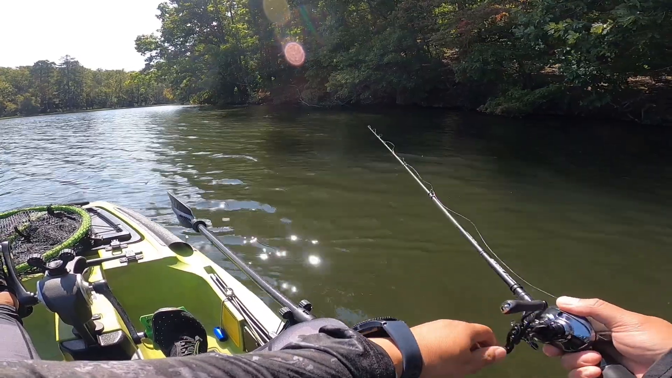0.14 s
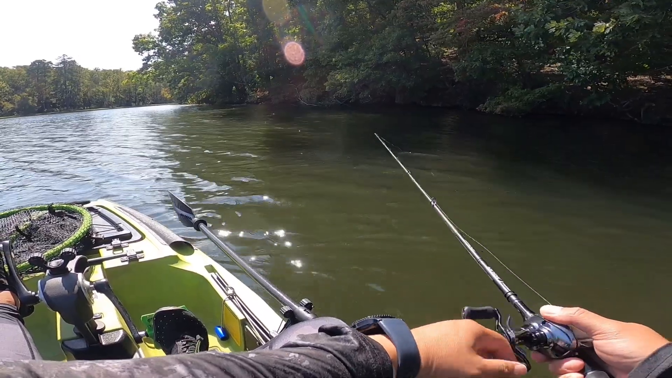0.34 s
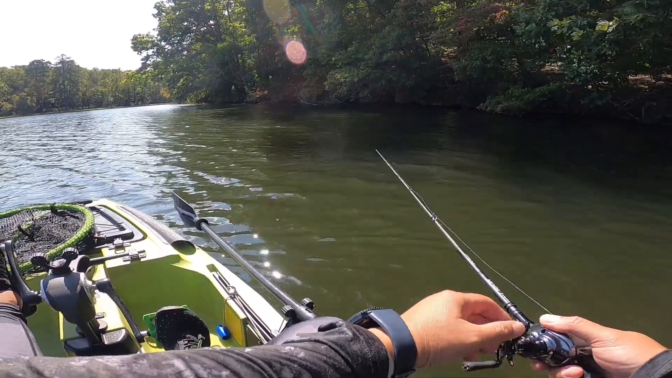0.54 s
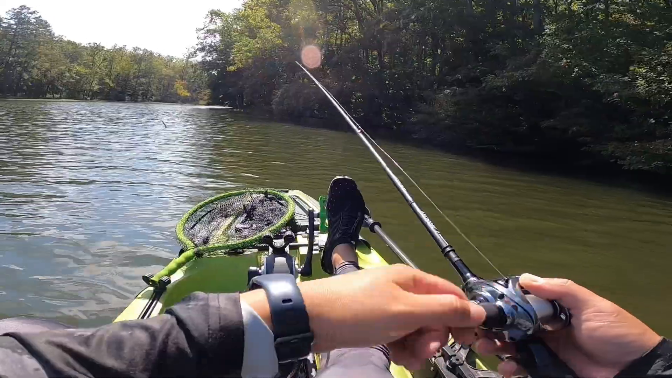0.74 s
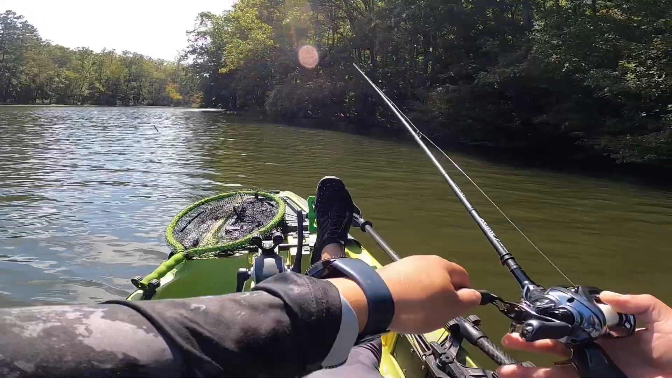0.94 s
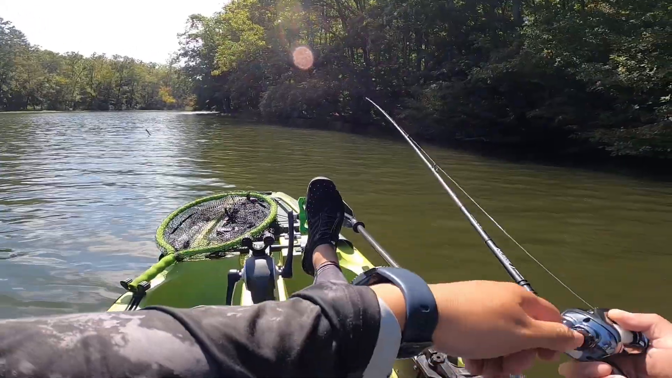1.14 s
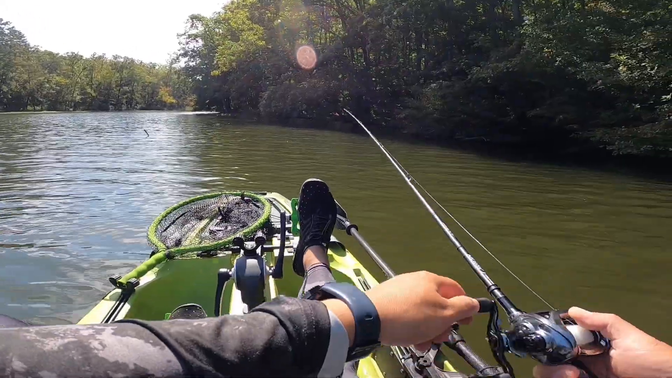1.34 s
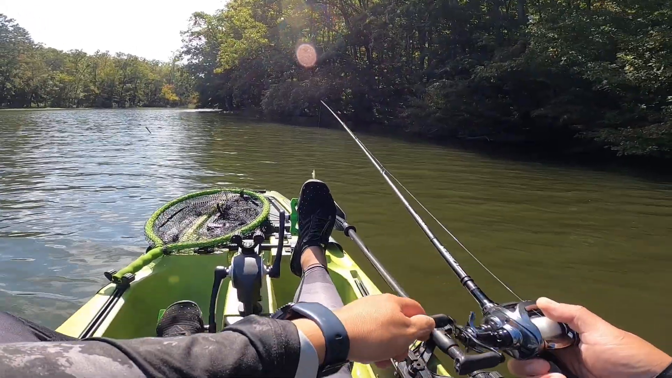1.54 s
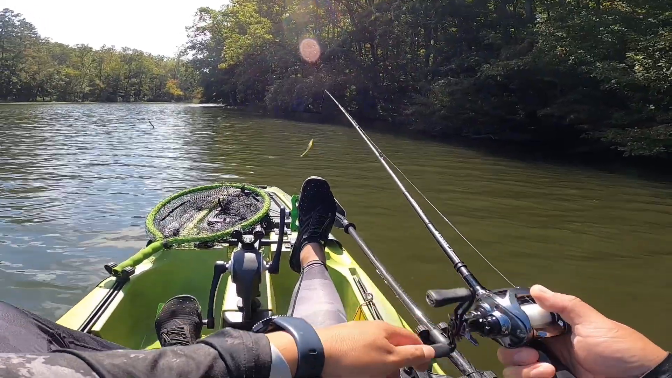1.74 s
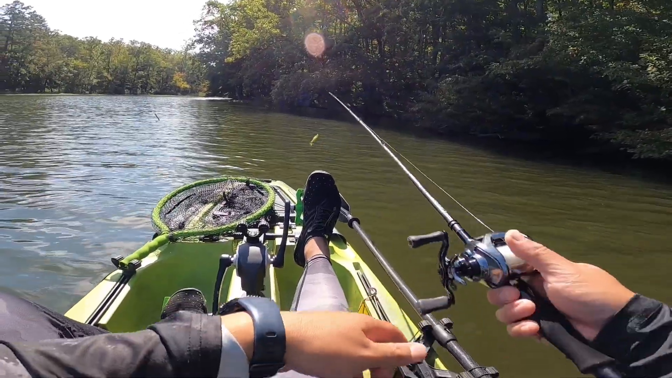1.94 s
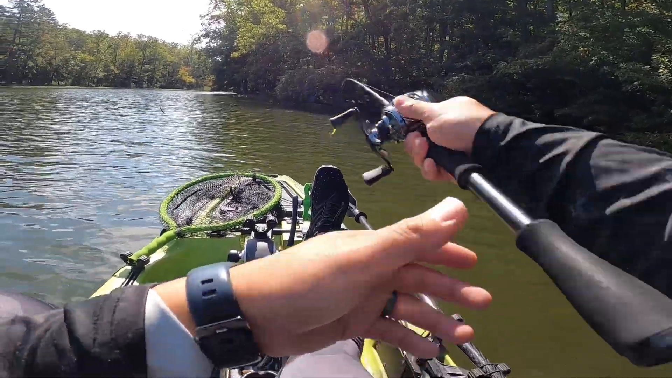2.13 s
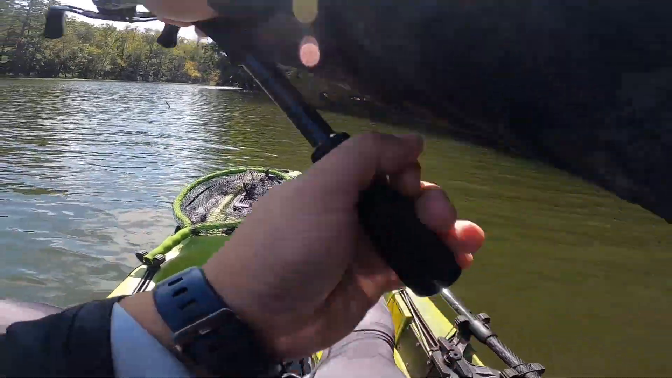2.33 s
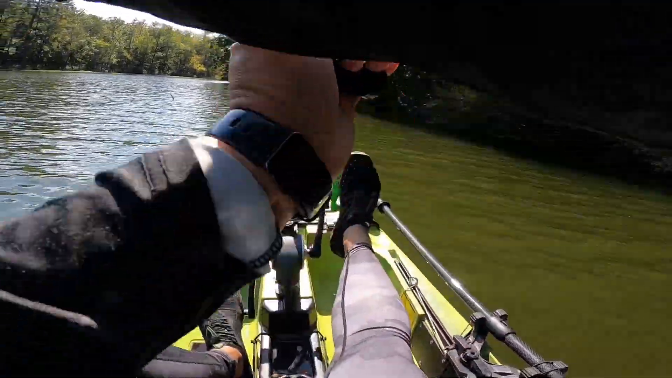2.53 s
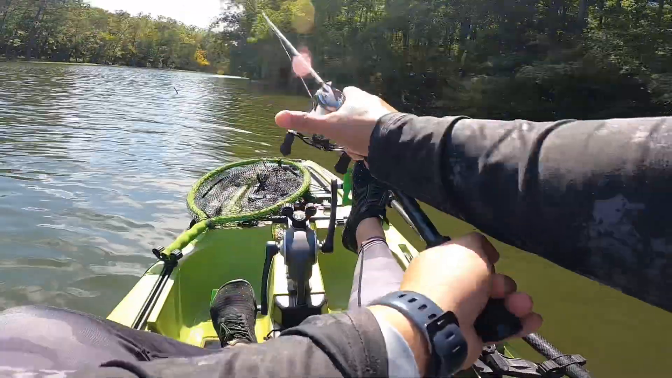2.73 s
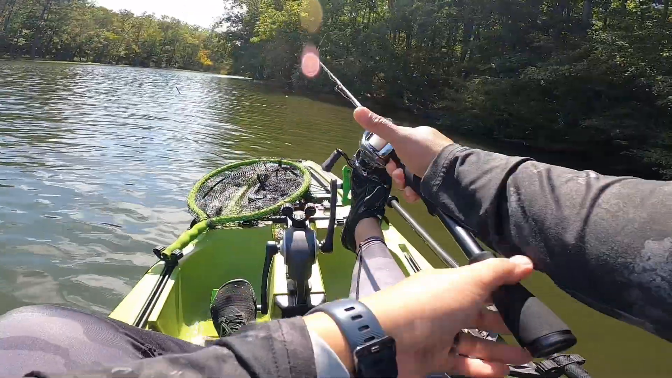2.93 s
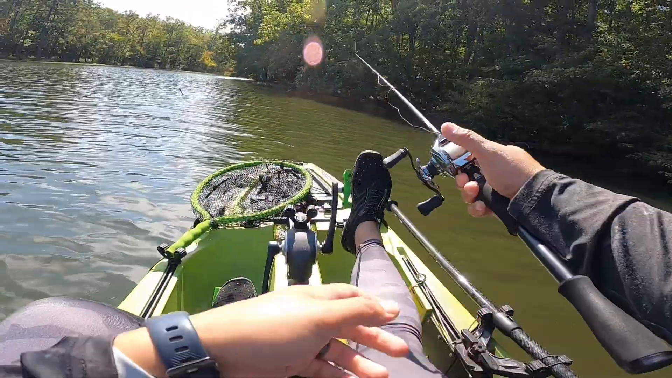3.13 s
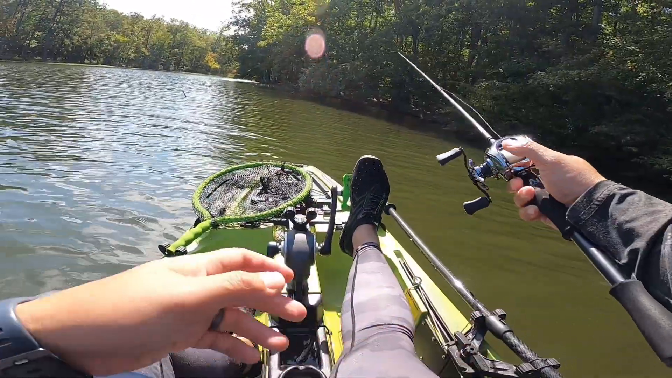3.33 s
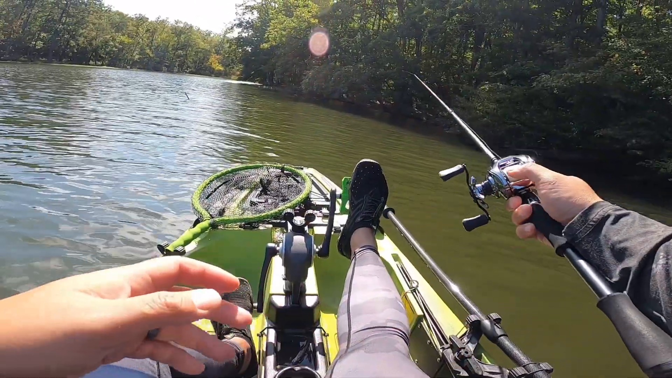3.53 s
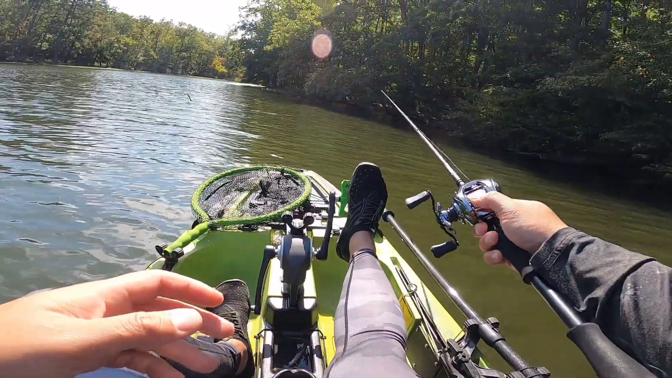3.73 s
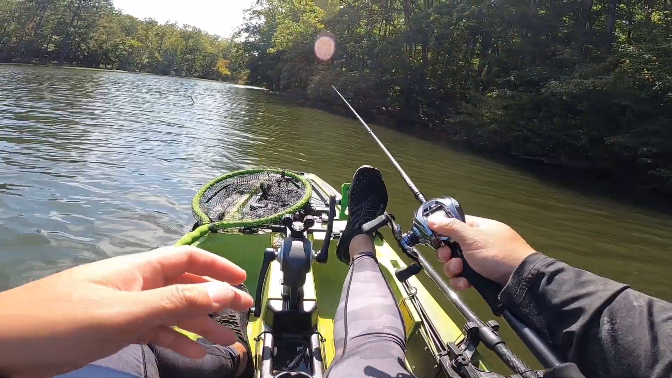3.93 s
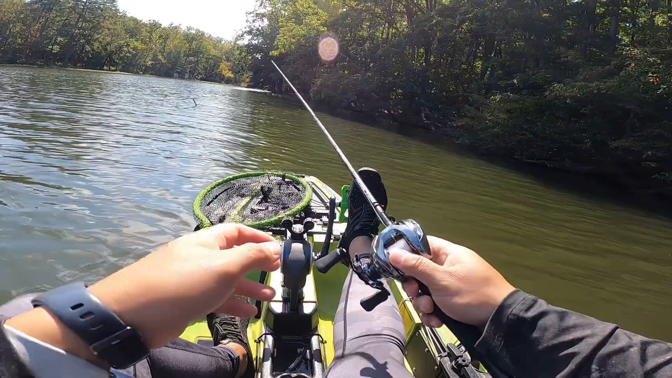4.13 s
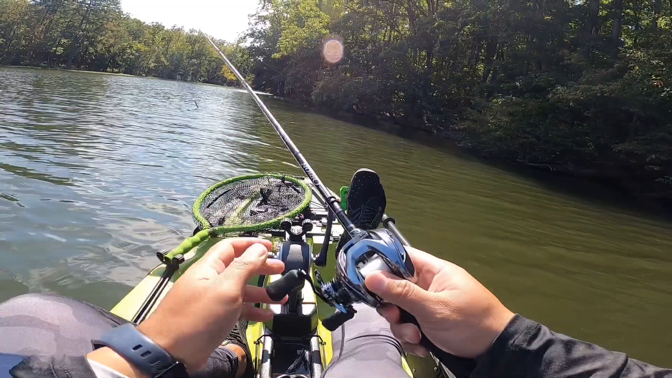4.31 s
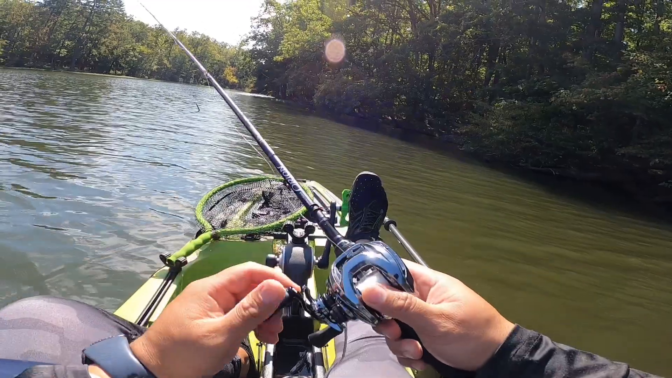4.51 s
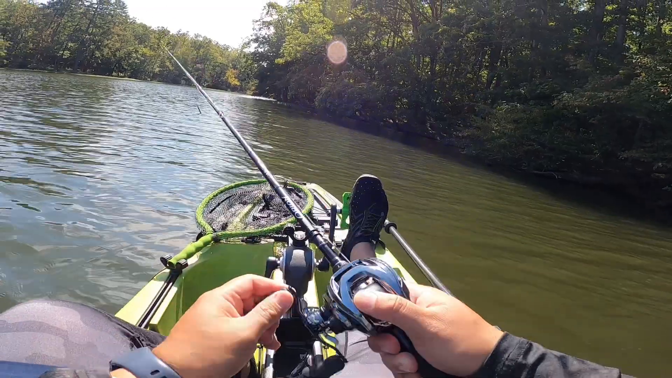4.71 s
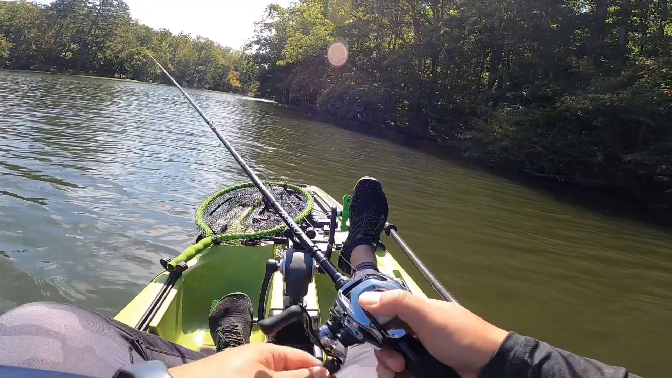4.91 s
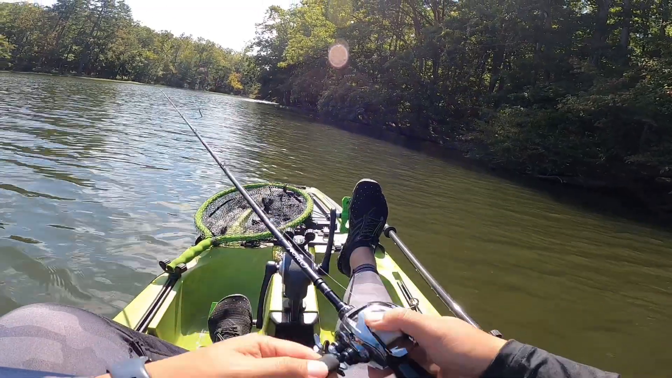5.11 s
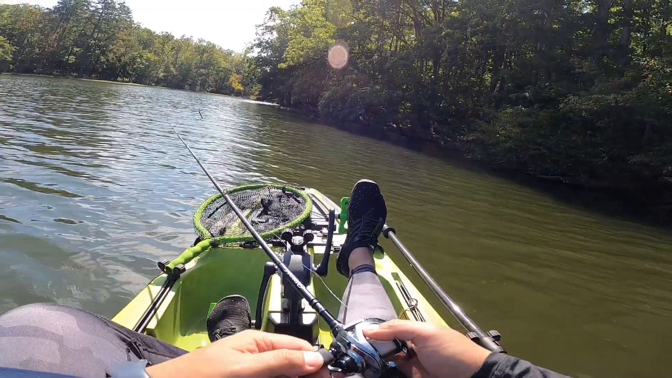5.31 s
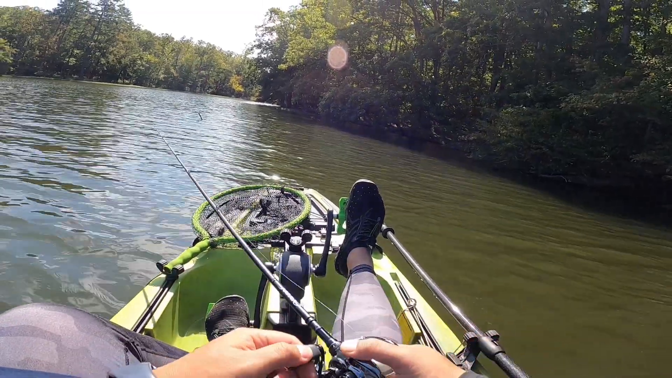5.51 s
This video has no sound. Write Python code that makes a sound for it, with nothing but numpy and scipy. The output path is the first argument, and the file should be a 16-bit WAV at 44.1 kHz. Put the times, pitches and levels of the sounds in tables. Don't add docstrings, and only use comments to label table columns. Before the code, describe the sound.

Low bumpy rumble and cloth rubbing on a chest camera as a fishing reel clicks, a cast thuds hard, then a sharp metallic reel snap.

```python
import sys
import numpy as np
from scipy import signal
from scipy.fft import rfft, irfft
from scipy.io import wavfile
from scipy.ndimage import uniform_filter1d

SR = 44100
rng = np.random.default_rng(int(sys.argv[2]) if len(sys.argv) > 2 else 0)


def wav_record(signal):
    frames = np.transpose(np.atleast_2d(signal))
    bounded = np.clip(frames, -1, 1)
    quanta = np.round(bounded * 32767).astype(np.int16)
    wavfile.write(sys.argv[1], SR, quanta)


def level_to_linear(level):
    exponent = np.asarray(level, float) / 20
    return 10 ** exponent


N = 245195
TIME = np.arange(N) / SR

# (frequency [Hz], density [dB/Hz])
SHAKE_COLOUR = [(12, -38), (20, -5), (91, -1), (125, 0.5), (172, 0), (305, -8.5), (381, -14.5),
                (419, -22.5), (595, -24), (831, -31), (900, -25), (1170, -31.5), (1980, -120)]
SHAKE_SIDE = [(12, -50), (20, -21.5), (97, 0), (135, -11), (215, -12), (532, -32.5), (900, -34),
              (1170, -59), (1980, -120)]
# (time [s], shake [dB], port difference [dB])
EFFORT = [(0, -53.5, -3), (.3, -52.5, -7), (.645, -50.5, -8), (.665, -36, -3), (.92, -30, -7),
          (1.05, -38, -4), (1.3, -33, -11), (1.75, -35, -12), (2.05, -39, -6.5), (2.45, -28, -2),
          (2.7, -33, -14), (3.06, -37, -3), (3.33, -38, 3), (3.42, -41, 0), (3.95, -43, 0),
          (4.05, -36.5, 4), (5.0, -37.5, -23), (5.4, -43, -14)]
JOLT_SHAKE_DB, JOLT_APART_DB = -4.5, -2
JOLT_RISE_S, JOLT_FALL_S, TWIST_FALL_S = 0.029, 0.046, 0.046

# (frequency [Hz], density [dB/Hz])
RUB_COLOUR = [(210, -36), (350, -4.5), (654, -10), (846, -11.5), (1100, -8.5), (1940, -9), (2100, -13),
              (2650, -10.5), (6150, -20.5), (7650, -28.5), (9000, -37), (11700, -59), (19800, -120)]
RUB_SIDE = [(210, -30), (350, -4), (663, 2), (858, -4), (1380, 6), (1810, 3.5), (2650, 3.5), (6070, 1),
            (9000, -11.5), (11700, -49), (19800, -120)]
FIZZ_COLOUR = [(5000, -42), (7000, -12.5), (8500, 0.5), (10100, -4.5), (12700, -8), (15100, -23),
               (16500, -42)]
# (time [s], level [dB])
BANK = [(0, -50), (2.1, -51.5), (4.5, -61), (5.56, -59.5)]
BANK_BRIGHT_DB, BANK_FIZZ_DB = 4.5, -74.5
# (peak time [s], rub [dB], rise [s], fall [s], brightness [dB/octave])
STROKES = [(.666, -40, 0.006, 0.22, -2), (.86, -36.5, 0.15, 0.26, -4), (1.2, -43.5, 0.3, 0.28, -3.5),
           (1.5, -42, 0.13, 0.13, -1), (1.82, -42.5, 0.3, 0.27, -1.5), (2.25, -39, 0.064, 0.064, -2),
           (2.44, -35, 0.15, 0.19, 0.4), (2.63, -43.5, 0.024, 0.12, 3), (2.8, -21, 0.029, 0.046, 0.5),
           (2.92, -32, 0.16, 0.16, -3), (3.1, -41, 0.38, 0.38, -3), (3.32, -43, 0.24, 0.045, -3),
           (3.6, -50, .3, 0.37, 0), (4.2, -45, 0.42, 0.68, -0.36), (4.82, -47, 0.025, 0.58, 1.9)]
FIZZ_DB, FIZZ_PER_RUB, FIZZ_PER_BRIGHT = -66, 0.84, 1.54

# (frequency [Hz], width [Hz], level [dB])
MOTOR = [
    (165.8, 18.5, -51.5),
    (328.5, 6.3, -59.5),
]
# (time [s], level [dB])
MOTOR_SWELL = [(0, -12), (3, -13), (3.5, 0)]

# (time [s], peak [dB], frequency [Hz], length [s], port difference [dB])
THUMPS = [(0.056, -31, 82.5, 0.022, 1), (0.674, -30.5, 87, 0.025, -12), (.951, -26.5, 133, 0.036, -15),
          (1.006, -35, 102, 0.022, 10), (1.362, -10, 155, 0.012, -1), (1.376, -15, 111, 0.011, -3),
          (1.396, -10.5, 125, 0.012, 5), (1.491, -25, 118, 0.022, 6), (1.864, -24.5, 203, 0.0084, 2),
          (2.225, -15, 166, 0.01, -2), (2.244, -9.5, 117, 0.016, 4.5), (2.263, -18.5, 150, 0.014, -2.5),
          (2.319, -13.5, 115, 0.028, 8), (2.346, -12, 106, 0.015, -4), (2.545, -16, 135, 0.033, -1),
          (2.653, -17.5, 68.6, 0.0086, 3), (2.771, -12, 119, 0.026, 4.5), (2.8, -6.5, 140, 0.031, 1),
          (2.825, -8.5, 132.4, 0.025, 1.5), (2.906, -7, 163, 0.011, -0.5)]

# (time [s], peak [dB], ring [Hz], brightness [dB/octave], left-right [dB])
TICKS = [(0.6645, -28.5, 2350, -6, 1), (0.6948, -27, 1830, -8, 1), (0.8645, -21.5, 2130, -9, 1),
         (1.3542, -14, 2300, -11, 7), (1.7749, -25, 1440, -21, 4), (2.2174, -5.5, 1410, -1.5, 3),
         (2.2699, -2.5, 4920, 3, 0.5), (2.2808, -17, 3140, -11, 3), (2.3092, -19.5, 1550, -16, -6),
         (2.6775, -21, 1990, -1, 5), (2.8774, -16.5, 1450, -10, 2), (2.9333, -12.5, 2050, -3, 2),
         (4.499, -25.5, 2560, -3, -9), (5.2803, -30, 1500, -6, -2), (5.353, -40, 5140, 10, 0)]
SNAPS = [
    (0.8363, -29.5, 2130, 18, -4),
    (4.788, 0.5, 5730, -0.5, 7),
]
FLICKS = [(1.3866, -15, 2180, 3, 0), (1.3935, -19, 3240, 6, 11), (1.905, -26, 2900, -4, 2),
          (2.2018, -26, 3500, 1, 8), (2.21, -27, 3210, 0, 8), (2.3001, -23, 2760, -5, 12),
          (2.7499, -10.5, 2180, 0, 2), (2.8254, -10.5, 1910, -12, 12), (2.8974, -11.5, 4970, -2.5, 8),
          (4.3759, -32, 2350, -16, -14), (4.634, -41, 2880, 3, -6), (4.6778, -36.5, 3400, -2, -2),
          (4.7655, -20, 2730, -3, -3), (5.1245, -30, 1830, -10, 12), (5.177, -29, 2600, 2, 3)]
RATTLES = [(1.4778, -13, 3550, -3, 0), (3.3132, -27, 3480, -3.5, 2), (2.41, -23, 4900, 24, 4),
           (2.5586, -26, 1440, -18, -5), (2.7147, -21, 1640, 4, 1.5), (2.7826, -6.5, 1300, -19, 2),
           (2.7965, -8.5, 1400, -9, -7), (2.8073, -5, 3080, -7, 7), (2.8412, -14, 3300, -2, 10),
           (4.096, -35, 1580, -6, 4), (5.1413, -19.5, 1540, -1.5, 2)]
SPARKS = [
    (2.73, -18.5, 3170, -5, 9),
    (2.7418, -8, 3130, -1.5, 15),
]
TICK_TREBLE_DB, RATTLE_TREBLE_DB, SNAP_TREBLE_DB, FLICK_TREBLE_DB, SPARK_TREBLE_DB = -58, -21.5, -12.5, -50, -26
TICK_LENGTH, RATTLE_LENGTH, SNAP_LENGTH, FLICK_LENGTH, SPARK_LENGTH = 0.83, 0.86, 0.88, 0.44, 0.56
# (frequency [Hz], level [dB])
REEL = [(500, -41), (1000, -12), (1700, 3), (2300, 0.5), (3300, 1.5), (5000, -2.5), (6200, -2), (7500, -12),
        (9000, -64)]
TREBLE = [(6000, -45), (7800, 13.5), (10200, -6.5), (12700, 3), (15000, -18), (17000, -33)]
# (frequency [Hz], t60 [s])
FRAME = [(1400, 0.0073), (2200, 0.03), (3270, 0.017), (4000, 0.015), (5000, 0.0097), (5750, 0.0066)]
# (frequency [Hz], level [dB])
LID = [(6300, 0), (7200, -2), (8600, -40), (20000, -70)]

# (time [s], peak [dB], frequency [Hz], t60 [s], left-right [dB])
KNOCKS = [(0.6673, -21.5, 1060, 0.035, -1), (1.3539, -19.5, 936, 0.028, -12), (1.3948, -18, 265, 0.035, -1),
          (1.4771, -24.5, 360, 0.047, -4), (1.8564, -23.5, 990, 0.055, 2), (2.2166, -18, 492, 0.066, -4.5),
          (2.271, -23, 1030, 0.045, 1), (2.3106, -21.5, 370, 0.042, 1), (2.5345, -19, 620, 0.067, 1),
          (2.6936, -18.5, 480, 0.02, 1), (2.7421, -10, 354, 0.0082, 0.5), (2.7832, -10, 408, 0.029, 4),
          (2.8162, -10.5, 625, 0.09, -3), (2.8303, -15.5, 463, 0.058, -8), (2.8813, -13, 607, 0.053, 4.5),
          (2.8965, -13.5, 334, 0.056, -9.5), (3.7136, -27, 515, 0.036, -4), (4.0995, -24.5, 423, 0.012, 0),
          (4.3771, -22.5, 543, 0.026, -2), (4.7885, -17, 974, 0.094, 0), (5.1395, -32.5, 950, 0.13, 0),
          (5.2814, -39, 924, 0.045, 2)]
# (time [s], peak [dB], frequency [Hz], t60 [s])
CREAKS = [
    (0.783, -45, 400, 0.045),
    (1.429, -34, 400, 0.04),
    (1.6556, -33, 400, 0.054),
    (1.6901, -26, 382, 0.11),
    (1.7317, -30, 415, 0.13),
    (1.774, -22, 425, 0.11),
    (1.8122, -24, 393, 0.069),
    (3.039, -22.5, 370, 0.057),
    (3.065, -21.5, 385, 0.029),
]
STRAP_PAN_DB = 1
# (frequency [Hz], level [dB])
HOUSING = [(20, -1), (6300, 2.5), (8000, -3), (11000, -1), (20000, -44)]

# (time [s], peak [dB], frequency [Hz], half length [s], left-right [dB])
PINGS = [(.864, -31, 1500, .0015, 0), (1.178, -37, 4260, .0015, 0), (1.22, -55, 8500, .0006, 0),
         (1.353, -22.5, 3400, 0.002, 8), (1.356, -24, 2150, 0.0029, 2), (1.3538, -19.5, 2870, .001, 4),
         (1.478, -17.5, 3720, .0012, 0), (1.767, -25, 1050, .0015, 0), (1.856, -28, 1050, 0.0017, 0),
         (1.692, -43, 7500, .001, 0), (2.2018, -20, 4300, .0002, 8), (2.21, -26, 3500, .0002, 8),
         (2.218, -23, 5800, .0015, 7), (2.218, -22, 3300, .002, 6), (2.2355, -30, 3000, .0005, 2),
         (2.601, -36, 5000, .0005, 0), (2.601, -55, 10500, .0004, 0), (2.7422, -18.5, 5200, 0.00092, 6),
         (2.7486, -21, 5200, 0.0011, 4), (2.784, -24, 5800, .0015, 2), (2.781, -18, 3300, 0.0016, 7),
         (2.807, -24, 5000, .0012, 2), (2.829, -23, 3700, .0015, 0), (2.897, -18.5, 3060, 0.0014, 7),
         (2.9325, -19.5, 3300, .001, 7), (2.825, -21, 2000, .0006, 4), (2.8412, -23, 3400, 0.0014, 4),
         (4.377, -33.5, 2400, 0.0017, 0), (4.507, -38, 3300, .0006, 0), (4.634, -42, 4900, .001, 0),
         (4.7663, -25, 2900, 0.0009, 0), (4.7895, -20, 12500, 0.0011, -6), (4.7888, -10, 2250, .0015, 0),
         (4.789, -25, 4100, 0.00094, 0), (5.134, -37, 1900, 0.0025, 0), (5.177, -36, 4200, .0003, 0),
         (5.2803, -37, 2200, .0006, 0), (5.352, -51, 2000, 0.0028, -2.5)]

# (time [s], rms [dB], frequency [Hz], width [Hz], half length [s]) Brief bright #
SIZZLES = [(1.479, -43, 9600, 2500, .0025), (2.262, -58, 12000, 5000, .008),
           (2.2695, -36, 14800, 2500, .0014), (2.712, -58, 12000, 4000, .002),
           (2.733, -56, 11000, 6000, .0015), (2.742, -48, 13500, 5000, .001),
           (2.781, -52, 13500, 3000, .001), (2.79, -55, 13500, 5000, .016),
           (2.807, -48, 12500, 5000, .0015), (4.77, -55, 9500, 3000, .012), (4.784, -41, 11000, 6000, .004),
           (4.789, -32, 9000, 3000, .002), (4.8, -57, 9500, 4000, 0.0065)]
SCUFFS = [(1.775, -29.5, 1120, 1070, 0.0082), (1.864, -36.5, 880, 900, 0.011),
          (1.741, -35.5, 392, 110, 0.053), (4.7845, -23, 4000, 4380, 0.0059),
          (4.7894, -9, 4200, 4550, 0.002), (4.794, -24.5, 2500, 3460, 0.0046)]
SWISHES = [(2.997, -40, 428, 150, .008), (3.038, -37, 700, 248, .008), (3.07, -38, 1500, 293, .012),
           (3.07, -40.5, 1080, 150, 0.024), (3.078, -36, 500, 300, .01), (3.172, -38, 1250, 700, .008),
           (3.195, -43, 970, 120, .016), (3.235, -42.5, 940, 120, 0.025), (4.502, -40, 2300, 1200, 0.0048),
           (1.768, -40, 1600, 1500, 0.0046), (1.785, -35.5, 800, 700, 0.012), (1.858, -34, 597, 600, .005),
           (5.15, -42, 1500, 1200, 0.0074), (5.288, -53, 1474, 1200, .008)]
# (frequency [Hz], level [dB])
SIZZLE_COLOUR = [(5000, -40), (7500, 1.5), (15500, 4), (16600, -20)]

# (time [s], level [dB])
SPRING = [(4.75, -90), (4.756, -48), (4.772, -36), (4.787, -25), (4.79, -90)]
# (time [s], level [dB])
GEARS = [(4.79, -90), (4.81, -51), (4.86, -54), (4.92, -67), (5.02, -54), (5.07, -86)]
SPRING_HZ, GEAR_HZ = 6090, (1445, 2480, 2790)

# (frequency [Hz], level [dB], t60 [s])
CLACK = [
    (947, 0, .06),
    (1340, -2, .09),
    (2400, 7, 0.044),
]
CLACK_S, CLACK_DB = 4.789, -25

# (time [s], level [dB])
WIDTH = [(3, 5.5), (3.2, -8), (3.55, -25), (3.65, -63)]
# (time [s], level [dB], fall [s])
REOPEN = [
    (4.79, -21, .004),
    (5.135, -2, 0.015),
]


def evened(x):
    return x / np.sqrt(np.mean(x ** 2) + 1e-20)


def read(points, hz):
    f, value = np.transpose(points)
    return np.interp(np.log(hz + 1), np.log(f + 1), value)


def curve(rows, t, axis=1):
    rows = np.array(rows)
    return np.interp(t, rows[:, 0], rows[:, axis])


def add(mix, s, sound):
    part = mix[:, round(s * SR):][:, :sound.shape[1]]
    part += sound[:, :part.shape[1]]


def coloured(x, colour):
    gain = level_to_linear(read(colour, np.fft.rfftfreq(x.shape[-1], 1 / SR)))
    return irfft(rfft(x) * gain, x.shape[-1])


def resonate(x, hz, width):
    turn = np.exp(2j * np.pi * hz * np.arange(x.shape[-1]) / SR)
    r = np.exp(-np.pi * width / SR)
    return 2 * (turn * signal.lfilter([1 - r], [1, -r], x / turn)).real


def twice_resonated(x, hz, width):
    return evened(resonate(resonate(x, hz, width), hz, width))


def noise(colour, size, patchy_db, flicker_db, tilt=None):
    hop, hz = size // 4, np.fft.rfftfreq(size, 1 / SR)
    frames = N // hop + 5
    a, b, patches = rng.standard_normal((frames, len(hz), 3)).T
    patches = uniform_filter1d(patches, size=5, axis=0)
    patches = evened(uniform_filter1d(patches, size=9, axis=1))
    flicker = evened(uniform_filter1d(rng.standard_normal(frames), size=4))
    field_db = read(colour, hz)[:, None] + patchy_db * patches + flicker_db * flicker
    if tilt is not None:
        octaves = np.log2(np.clip(hz[:, None], 600, 5000) / 2500)
        field_db += octaves * (1.76 + np.interp(np.arange(frames) * hop / SR, TIME, tilt))
    z = (a + 1j * b) * level_to_linear(field_db)
    return evened(signal.istft(z, nperseg=size, noverlap=size - hop)[1][:N])


def ports(common, difference):
    return np.array([common + difference, common - difference])


def panned(pan_db):
    return level_to_linear([[pan_db / 2], [-pan_db / 2]])


def blow(t, rise, t60):
    return np.where(t < 0, np.exp(-(t / rise) ** 2), level_to_linear(-60 * np.maximum(t, 0) / max(t60, .004)))


def swell(s, rise, fall):
    return level_to_linear(-20 * np.where(TIME < s, (s - TIME) / max(rise, .002), (TIME - s) / max(fall, .002)))


def shake():
    common = noise(SHAKE_COLOUR, size=2048, patchy_db=2.0, flicker_db=2.0)
    apart = noise(SHAKE_SIDE, size=2048, patchy_db=2.0, flicker_db=2.0)
    jolts, twists = np.zeros(N), np.zeros(N)
    for s, db, _, length, apart_db in THUMPS:
        power = (level_to_linear(db + JOLT_SHAKE_DB) * length / 0.026) ** 2
        jolts += power * swell(s, JOLT_RISE_S, JOLT_FALL_S)
        twists += power * level_to_linear(apart_db + JOLT_APART_DB) ** 2 * swell(s, JOLT_RISE_S, TWIST_FALL_S)
    moving = level_to_linear(curve(EFFORT, TIME))
    level = np.sqrt(moving ** 2 + jolts)
    unlike = moving * level_to_linear(curve(EFFORT, TIME, axis=2))
    sway = coloured(common, [(50, -0.5), (95, -21)])
    common = common - sway * (1 - (level / level_to_linear(-35.5)) ** -.45)
    steady = ports(moving * common, level_to_linear(-2.5) * unlike * apart)
    extra_unlike = np.sqrt(unlike ** 2 + twists) - unlike
    stirred = ports((level - moving) * common, level_to_linear(-2.0) * extra_unlike * apart)
    return steady + coloured(stirred, [(260, 0), (600, -7.5)])


def rub():
    bank = level_to_linear(curve(BANK, TIME)) ** 2
    power, bright, fizz_power = bank, bank * BANK_BRIGHT_DB, level_to_linear(BANK_FIZZ_DB) ** 2
    for s, db, rise, fall, bright_db in STROKES:
        stroke = swell(s, rise, fall)
        power = power + level_to_linear(db) ** 2 * stroke
        bright = bright + level_to_linear(db) ** 2 * stroke * bright_db
        fizz_db = FIZZ_DB + FIZZ_PER_RUB * (db + 42.5) + FIZZ_PER_BRIGHT * bright_db
        fizz_power = fizz_power + level_to_linear(fizz_db) ** 2 * stroke ** FIZZ_PER_RUB
    tilt = bright / power
    common = noise(RUB_COLOUR, size=256, patchy_db=1.5, flicker_db=-1.0, tilt=tilt)
    apart = noise(RUB_SIDE, size=256, patchy_db=3.0, flicker_db=-0.2, tilt=tilt)
    fizz = [noise(FIZZ_COLOUR, size=256, patchy_db=3.5, flicker_db=0.0) for _ in range(2)]
    hiss = np.sqrt(power) * ports(common, level_to_linear(-9.0) * apart)
    return hiss + np.sqrt(fizz_power) * ports(fizz[0], level_to_linear(-3.0) * fizz[1])


def motor():
    hum = sum(level_to_linear(db) * twice_resonated(rng.standard_normal(N), hz, width) for hz, width, db in MOTOR)
    return hum * level_to_linear(curve(MOTOR_SWELL, TIME))


def thumps():
    out, t = np.zeros((2, N)), np.arange(-2200, 4000) / SR
    for (s, db, hz, length, apart_db), (detune, phase) in zip(THUMPS, rng.random((len(THUMPS), 2))):
        shape = level_to_linear(db) * np.exp(-(t / (np.where(t < 0, .5, .8) * length)) ** 2)
        apart_hz = hz * (0.582 + 0.31 * detune)
        apart = level_to_linear(apart_db - 4.5) * np.sin(2 * np.pi * (apart_hz * t + phase))
        add(out, s + t[0], shape * ports(np.cos(2 * np.pi * hz * t), apart))
    return out


def clicks():
    out, t = np.zeros((2, N)), np.arange(-500, 2500) / SR
    parts = [(TICKS, TICK_TREBLE_DB, TICK_LENGTH), (RATTLES, RATTLE_TREBLE_DB, RATTLE_LENGTH),
             (SNAPS, SNAP_TREBLE_DB, SNAP_LENGTH), (FLICKS, FLICK_TREBLE_DB, FLICK_LENGTH),
             (SPARKS, SPARK_TREBLE_DB, SPARK_LENGTH)]
    hits = sorted((*hit, *kind) for part, *kind in parts for hit in part)
    bursts, draws = rng.standard_normal((len(hits), 3, 3000)), rng.random((len(hits), len(FRAME), 3))
    lag = np.array([[1], [-1]]) / SR
    for (s, db, hz, bright_db, pan_db, treble_db, length), burst, draw in zip(hits, bursts, draws):
        u = t / length
        fall = blow(u, 0.0016, 0.02) + level_to_linear(-22.0) * blow(u, 0.0048, 0.031)
        chatter = burst[0] + 0.79 * burst[1:]
        tone = [(f, v + bright_db * np.log2(max(f, 1500) / 2500)) for f, v in REEL]
        rattle = evened(coloured(chatter, tone))
        near = twice_resonated(chatter, hz, 1600)
        frame = 0
        for (f, t60), (spot, detune, phase) in zip(FRAME, draw):
            mode_db = bright_db * np.log2(f / 2500) - 14.3 * spot
            wave = np.cos(2 * np.pi * (f * (0.954 + 0.098 * detune) * (t - lag) + phase))
            frame = frame + level_to_linear(mode_db) * blow(u, 0.00053, t60) * wave
        ring = np.cos(2 * np.pi * hz * (t - lag)) * blow(u, 0.00088, 0.01)
        body = (0.35 * rattle + 0.4 * near) * fall + 0.82 * ring + 0.88 * frame / abs(frame).max()
        body = coloured(body, LID)
        treble = coloured(chatter, TREBLE) * blow(u, 0.0017, 0.019)
        click = body / abs(body.mean(0)).max() + level_to_linear(treble_db) * treble / abs(treble.mean(0)).max()
        click *= panned(pan_db)
        add(out, s + t[0], level_to_linear(db) * click / abs(click.mean(0)).max())
    return out


def knocks():
    out, t = np.zeros((2, N)), np.arange(-500, 4500) / SR
    hits = sorted(KNOCKS + [(*slip, STRAP_PAN_DB) for slip in CREAKS])
    lag = np.array([[4.5], [-4.5]]) / SR
    for (s, db, hz, t60, pan_db), burst in zip(hits, rng.standard_normal((len(hits), 3, 5000))):
        rough = evened(resonate(resonate(burst[0] + .5 * burst[1:], hz, 750), hz, 900))
        push = rough * blow(t, 0.0022, 0.047)
        hollow = np.cos(2 * np.pi * hz * (t - lag)) * blow(t, 0.0023, t60)
        add(out, s + t[0], level_to_linear(db) * panned(pan_db) * (240 / hz * hollow + 0.3 * push))
    return out


def pings():
    out, t = np.zeros((2, N)), np.arange(-500, 900) / SR
    for s, db, hz, half, pan_db in PINGS:
        shape = np.exp(-(t / (np.where(t < 0, .6, 1.3) * half)) ** 2)
        add(out, s + t[0], level_to_linear(db) * panned(pan_db) * shape * np.cos(2 * np.pi * hz * t))
    return out


def scuffs(rows):
    out, t = np.zeros((2, N)), np.arange(-1500, 1500) / SR
    for (s, db, hz, width, half), burst in zip(rows, rng.standard_normal((len(rows), 3, 3000))):
        scrape = twice_resonated(burst[0] + 0.27 * burst[1:], hz, width)
        add(out, s + t[0], level_to_linear(db) * scrape * np.exp(-(t / half) ** 2))
    return out


def clutch():
    whistle = np.sin(2 * np.pi * SPRING_HZ * TIME)
    whirr = sum(twice_resonated(rng.standard_normal(N), hz, 90) for hz in GEAR_HZ)
    return level_to_linear(curve(SPRING, TIME)) * whistle + level_to_linear(curve(GEARS, TIME)) * whirr


def clack():
    t = TIME - CLACK_S
    return sum(level_to_linear(CLACK_DB + db) * np.sin(2 * np.pi * hz * t) * blow(t, 0.00077, t60) for hz, db, t60 in CLACK)


def scene():
    body = shake() + rub() + motor() + thumps()
    gear = clicks() + coloured(knocks() + scuffs(SCUFFS), HOUSING) + pings()
    line = coloured(scuffs(SIZZLES), SIZZLE_COLOUR) + coloured(scuffs(SWISHES), LID)
    return body + gear + line + clutch() + clack()


def top_cut(x):
    return signal.sosfilt(signal.butter(12, 16690, fs=SR, output="sos"), x)


def record(dry):
    common, difference = (dry[0] + dry[1]) / 2, (dry[0] - dry[1]) / 2
    share = level_to_linear(curve(WIDTH, TIME)) + sum(level_to_linear(db) * swell(s, fall, fall) for s, db, fall in REOPEN)
    top = coloured(difference, [(9500, -73), (11000, 1.5)])
    narrowed = ports(common, difference * share + top * np.clip(1 - share, 0, 1))
    flattened = coloured(np.clip(narrowed, -1, 1), [(15200, 0), (16700, -16)])
    return top_cut(np.clip(flattened, -1, 1))


dry = scene()
out = record(dry)
wav_record(out)
```